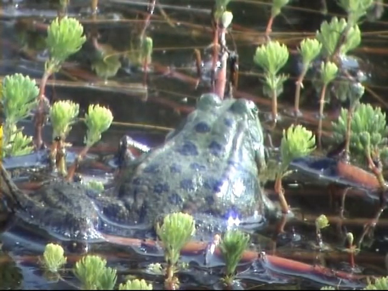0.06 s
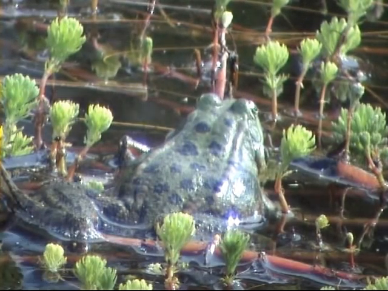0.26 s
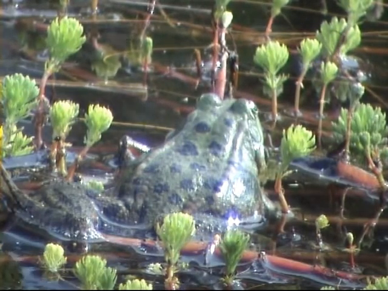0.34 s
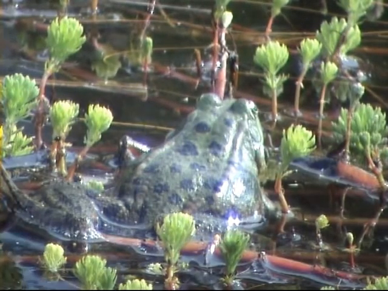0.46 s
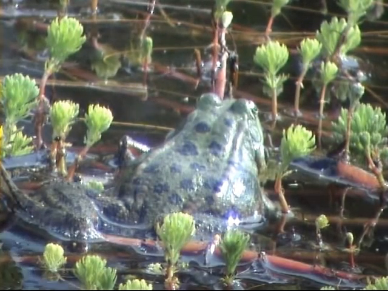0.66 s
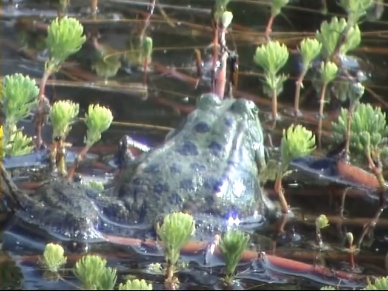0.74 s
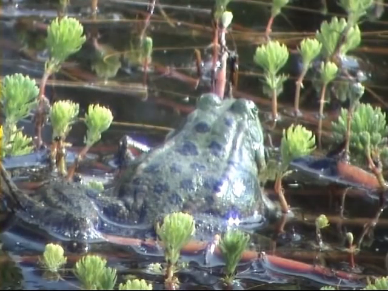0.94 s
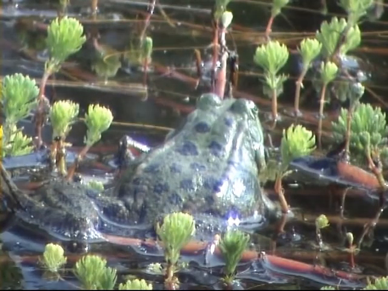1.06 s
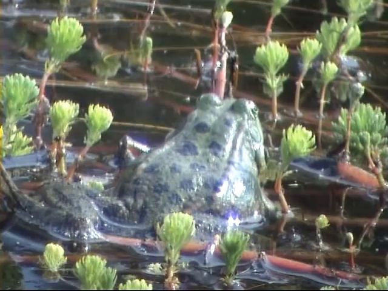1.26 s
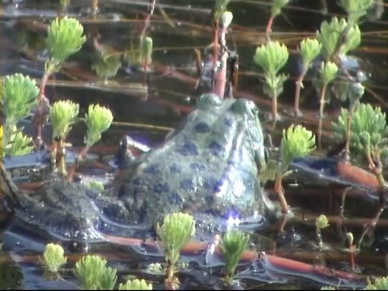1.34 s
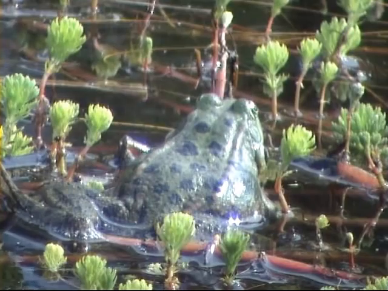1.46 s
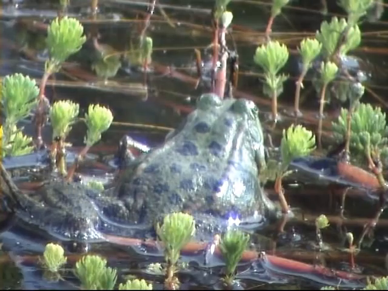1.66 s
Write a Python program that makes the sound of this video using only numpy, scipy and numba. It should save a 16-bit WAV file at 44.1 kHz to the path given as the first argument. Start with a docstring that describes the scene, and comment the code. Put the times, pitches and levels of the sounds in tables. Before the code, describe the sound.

A frog gives one rough, swelling croak, then a quick run of short cackles that fade at the end. Behind it at the pond are a small splash, faint bird chirps, distant frogs and a low outdoor rumble.

```python
"""At the edge of a pond, a frog gives one long rough croak, then a run of short cackles.
Its voice box makes fast snaps that ring its vocal sacs (the pouches it blows up) and its belly.
In most cackles the snaps slow down; a brief, thin ring marks the start of the third.
Behind the frog are a small splash, faint birds, a far chorus of frogs and a low outdoor rumble."""
import sys
import numpy as np
from scipy import signal
from scipy.fft import rfft, irfft
from scipy.io import wavfile
from scipy.ndimage import uniform_filter1d, minimum_filter1d
from numba import njit

SR = 44100
rng = np.random.default_rng(int(sys.argv[2]) if len(sys.argv) > 2 else 0)


def inscribe(sig):
    """Save sig as 16-bit PCM at rate SR to the path in sys.argv[1].

    A 1-D sig is mono; a 2-D sig holds one channel per row.
    Samples are clipped to [-1, 1] before scaling.
    """
    pcm = np.round(np.clip(np.atleast_2d(sig).T, -1, 1) * 32767)
    wavfile.write(sys.argv[1], SR, pcm.astype(np.int16))


N = 74970

JITTER, SHIMMER_DB = .06, 3.5  # at roughness 1: scatter of snap timing (share of a gap) and of level
FLUTTER_PER_S = 170  # how fast the pitch of the sacs wavers
SAC_PULL = 0.65  # share of the way a snap moves toward a crest of the sacs' swing


def frog():
    """One frog croaks, cackles and gurgles, with a faint fizz of air and an echo from the banks."""
    # Speed of the snaps in the long croak: (time [s], rate [snaps per s])
    croak_speed = [(.22, 460), (.238, 392), (.266, 398), (.28, 339), (0.311, 332), (0.324, 350),
                   (.338, 345), (.352, 305), (0.367, 256), (.385, 284), (0.394, 310), (.402, 335),
                   (.411, 335), (.419, 230), (0.432, 295), (0.452, 260), (0.465, 200), (.5, 179)]
    # Course of the long croak; belly and upper ring are relative to the snap: (time [s], snap level [dB],
    # sac pitch [Hz], belly [dB], upper ring [dB], upper pitch [Hz], roughness [0 = smooth])
    croak_shape = [(.215, -38, 1583, -43.5, -14.5, 4200, 0.58), (.228, -21.5, 1628, -33, -14, 4410, .3),
                   (.262, -19.5, 1676, -30.5, -23.5, 4350, 0.33),
                   (.285, -16.5, 1557, -18, -17.5, 4420, 0.16), (.308, -15.5, 1502, -15.5, -28, 4600, 0.11),
                   (.324, -12.5, 1388, -25, -22, 4690, 0.2), (.344, -13.5, 1154, -9.5, -30.5, 4980, 0.2),
                   (.365, -10, 1203, -19.5, -25.5, 4750, 0.02), (.39, -7.5, 1404, -20, -23, 4500, 0.1),
                   (.404, -7.5, 1368, -15, -15, 4300, .2), (.43, -6.5, 1505, -18.5, -12.5, 4230, .6),
                   (.455, -8.5, 1591, -15.5, -20.5, 4293, 0.4), (.477, -14, 1558, -19, -17, 4250, 0.8),
                   (.503, -18.5, 1637, -19.5, -25, 4200, 1.1)]
    # A low gurgle between two cackles: same columns as the croak
    gurgle_shape = [(1.15, -43.5, 600, -20, -42, 3700, 0.51), (1.175, -30.5, 807, -25.5, -35, 3700, 0.5),
                    (1.205, -18.5, 1252, -17.5, -30.5, 3700, 0.68)]
    # One cackle a row: (peak time [s], rate there [snaps per s], gap growth per snap [factor],
    # snap level [dB], rise [s], fall [s], sac pitch [Hz], sac bandwidth [Hz],
    # belly [relative dB], middle ring [relative dB], upper ring [relative dB])
    cackles = [ (.8243, 240, 1.103, -14, 0.025, .025, 1405, 277.5, -17, -33.5, -32),
               (0.918, 216, 1.08, -9, 0.03, 0.015, 1757, 196.4, -24.5, -15.5, -20.5),
               (1.0141, 230, 1.052, -6, 0.018, 0.021, 1774, 174, -23, -22.5, -14.5),
               (1.1183, 241, 1.1, -7, 0.022, 0.023, 1740, 180, -24.5, -27, -14),
               (1.2276, 210, 1.106, -5, .028, .016, 1641, 220, -24, -34.5, -19),
               (1.248, 227, 0.99, -13, 0.032, 0.02, 1506, 157, -29.5, -42.5, -13),
               (1.286, 284, 0.96, -15.5, 0.021, 0.02, 1557, 180, -31, -37, -11.5),
               (1.3283, 213, 1.13, -6.5, 0.02, 0.022, 1437, 238, -19, -37, -17),
               (1.4347, 210, 1.267, -9.5, 0.02, 0.03, 1460, 214, -23, -35, -22),
               (1.6043, 261, 1.13, -21.5, 0.029, 0.028, 1398, 236, -16.5, -47, -23),
               (1.686, 202, 1.19, -20, 0.028, 0.021, 1441, 220, -21.5, -48, -21.5)]
    # Tone colour of the voice: (frequency [Hz], gain [dB])
    voice_tone = [(200, -5.5), (500, 2), (800, 2), (1150, 0), (1380, 5), (1780, 5), (1980, -0.5),
                  (2300, 2.5), (2900, -3), (4400, -4.5), (5300, 0), (6200, -10), (10500, -9),
                  (15000, -21.5)]
    long_call = croak(croak_shape, np.interp(np.arange(N) / SR, *np.array(croak_speed).T))
    short_calls = sum(cackle(*row) for row in cackles) + croak(gurgle_shape, rate_hz=228.7)
    voice = pan(long_call, db=-0.5) + pan(short_calls, db=0.7)
    low_cut = signal.butter(6, 355, "high", fs=SR, output="sos")
    voice = colour(signal.sosfilt(low_cut, voice), voice_tone)
    breath = np.abs(long_call) ** .3 * rng.standard_normal(N)
    fizz = level(ring(breath, hz=9270, width_hz=3000), db=-72)
    return from_the_left(voice) + fizz + bank_echo(voice)


def croak(curve, rate_hz):
    """A long run of snaps rings the sacs at a gliding pitch; roughness makes the snaps uneven."""
    t = np.arange(N) / SR
    when, db, sac_hz, belly_db, upper_db, upper_hz, rough = np.array(curve).T
    cycles = np.cumsum(rate_hz * ((t > when[0]) & (t < when[-1]))) / SR
    times = np.interp(np.arange(1, cycles[-1]), cycles, t)
    per_snap = lambda column: np.interp(times, when, column)
    level_luck, time_luck = rng.standard_normal((256, 2))[:len(times)].T * per_snap(rough)
    snap_db = per_snap(db) + SHIMMER_DB * level_luck
    flutter = .045 * np.interp(t, when, rough) * wander(FLUTTER_PER_S)
    sac = np.interp(t, when, sac_hz) * (1 + flutter)
    uneven = times + JITTER * time_luck * np.gradient(times)
    uneven = pull_to_crests(uneven, sac, SAC_PULL * np.minimum(2 * per_snap(rough), 1))
    return throat(uneven, snap_db, snap_db + per_snap(belly_db), snap_db - 49, snap_db + per_snap(upper_db),
                  sac, width_hz=172, upper_hz=np.interp(t, when, upper_hz))


def cackle(at, rate_hz, growth, db, rise_s, fall_s, sac_hz, width_hz, belly_db, middle_db, upper_db):
    """A thin squeak of snaps swells and dies away; growth above 1 slows the snaps down."""
    fastest_hz, roughness, rise_db, fall_db = 579, .15, 20, 17.5
    squeak_db, squeak_s = -14, 0.03
    count = np.arange(-20, 10)  # snap 0 is the peak
    gaps = np.maximum(growth ** count / rate_hz, 1 / fastest_hz)
    from_peak = np.cumsum(gaps) - gaps - gaps[count < 0].sum()
    level_luck, time_luck = roughness * rng.standard_normal((len(count), 2)).T
    squeak = squeak_db - rise_db * (from_peak / squeak_s) ** 4
    rise = np.maximum(-rise_db * np.abs(from_peak / rise_s) ** 1.8, squeak)
    fall = -fall_db * (from_peak / fall_s) ** 2
    effort_db = np.where(from_peak < 0, rise, fall) + SHIMMER_DB * level_luck
    high_db = db + np.where(from_peak < 0, 0.44, 1) * effort_db  # the high rings swell less steeply
    # The pitch of the sacs sags when the effort is low.
    sag = .004 * np.interp(np.arange(N) / SR, at + from_peak, np.maximum(effort_db, -rise_db))
    sac = sac_hz * (1 + sag + .022 * wander(FLUTTER_PER_S))
    times = pull_to_crests(at + from_peak + JITTER * time_luck * gaps, sac, SAC_PULL)
    upper_hz = 4330 + 0.43 * (sac_hz - 1650)  # partly follows the sacs
    return throat(times, db + effort_db, db + belly_db + effort_db, high_db + middle_db,
                  high_db + upper_db, sac, width_hz, upper_hz)


def pull_to_crests(times, sac_hz, pull):
    """The ringing sacs trip each snap near a crest of their own swing, so the ring builds up."""
    t = np.arange(N) / SR
    cycle = np.interp(times, t, np.cumsum(sac_hz) / SR)
    return times - pull * (cycle - np.round(cycle)) / np.interp(times, t, sac_hz)


def throat(times, db, belly_db, middle_db, upper_db, sac_hz, width_hz, upper_hz):
    """Each snap and its puff of air ring the sacs, the belly and two high, thin tones."""
    air_db, puff_s = -26, 0.0022
    air = amp(air_db) * rng.standard_normal(N)

    def push(snap_db):
        pulses = snaps(times, amp(snap_db))
        return pulses + air * signal.lfilter([1], [1, -np.exp(-1 / (puff_s * SR))], pulses)

    sacs = ring(push(db), sac_hz, width_hz)
    belly = ring(push(belly_db), hz=391, width_hz=69)
    middle = ring(push(middle_db), hz=3480, width_hz=98)
    upper = ring(push(upper_db), upper_hz, width_hz=162)
    return sacs + belly - middle - upper


def from_the_left(voice):
    """The voice arrives louder on the left, and slightly out of step between the two sides."""
    # How much louder the left side is: (frequency [Hz], left minus right [dB])
    balance = [(60, 3.0), (99, 3.5), (160, 5.0), (270, 2.5), (440, 11), (720, 5.5), (1190, 4.4),
               (1960, 1.2), (3220, 1.0), (5300, 0.5)]
    # How far the left wave runs ahead: (frequency [Hz], phase lead [radians])
    lead = [(0, 0), (260, 0.6), (600, 0.38), (1460, -0.7), (1720, -0.5), (3270, -0.88), (3530, 0.59),
            (4310, -0.77), (4740, -0.17), (5510, -0.0)]
    half = np.log(amp(on_bins(balance))) / 2 + 1j * on_bins(lead) / 2
    return irfft(rfft(voice, 2 * N) * np.exp([half, -half]))[:, :N]


def bank_echo(voice):
    """The banks throw the voice back as a soft, fading wash."""
    fade_s = 1  # time to fall by 60 dB
    tail = rng.standard_normal((2, N)) * np.exp(-np.log(1000) * np.arange(N) / SR / fade_s)
    return signal.fftconvolve(voice, level(tail, db=-25.5) / np.sqrt(N), axes=1)[:, :N]


def splash_and_thin_ring():
    """A small splash of short rings, and a brief, thin ring at the start of the third cackle."""
    # Short rings; the last row is the thin one: (time [s], pitch [Hz], bandwidth [Hz], level [dB])
    short_rings = [(.6335, 1750, 650, -18.5), (0.98, 980, 156, -33), (0.93, 2500, 800, -27),
                   (0.75, 9300, 3430, -42), (1, 3460, 108, -31)]
    return sum(ring(snaps(np.array([at]), amp(db)), hz, width) for at, hz, width, db in short_rings)


def birds():
    """Far birds whistle short, faint glides."""
    # Whistles: (start [s], length [s], first pitch [Hz], last pitch [Hz], level [dB])
    chirps = [(0.014, 0.037, 2100, 2510, -46.5), (0.509, 0.033, 2190, 2540, -47),
              (0.657, 0.0365, 2150, 2465, -43.5), (1.447, 0.061, 2150, 2496, -47),
              (1.533, .045, 5250, 4700, -55.5)]
    out = 0
    for at, length, start_hz, end_hz, db in chirps:
        progress = np.clip((np.arange(N) / SR - at) / length, 0, 1)
        hz = start_hz + (end_hz - start_hz) * np.sin(np.pi * progress / 2) + 30 * wander(220)
        out = out + amp(db) * np.sin(np.pi * progress) * np.sin(2 * np.pi * np.cumsum(hz) / SR)
    return out


def far_frogs():
    """Four distant frogs rattle as uneven snaps ring their sacs."""
    sac_hz, width_hz, rate_hz = 1574, 240, 190
    chorus = 0
    for _ in range(4):
        cycles = np.cumsum(rate_hz * np.exp(0.2 * wander(60))) / SR
        pulses = np.diff(np.floor(cycles), prepend=0) * amp(2.4 * wander(53))
        rattle = ring(pulses, sac_hz * (1 + 0.093 * wander(8.4)), width_hz)
        chorus = chorus + pan(ring(rattle, sac_hz, 3 * width_hz), db=4 * rng.standard_normal())
    return level(chorus, db=-53)


def outdoor_rumble():
    """Rumble, hiss and a wavering hum, louder on the left."""
    # Tone colour of the outdoor noise: (frequency [Hz], relative level [dB])
    noise_tone = [(15, -2), (32, -2), (50, -5.5), (130, -0.5), (180, -8), (270, -8.5), (360, -9.5),
                  (550, -8), (800, -13), (1150, -8), (1500, -6), (2000, -13.5), (2800, -19), (4500, -23.5),
                  (6000, -31.5), (10500, -38), (12500, -47.5), (15000, -52.5)]
    centre, side = level(colour(rng.standard_normal((2, N)), noise_tone), db=-44)
    hum_hz = 202.6 * (1 + 0.0052 * wander(9.2))
    hum = amp(-56) * np.sqrt(2) * np.sin(2 * np.pi * np.cumsum(hum_hz) / SR)
    return pan(centre + hum + amp(-6) * np.array([side, -side]), db=5)


def snaps(times, sizes):
    """Single clicks, each shared between two neighbouring samples."""
    at = np.clip(times * SR, 0, N)
    i = at.astype(int)
    before = np.bincount(i, sizes * (1 - at + i), N + 2)
    after = np.bincount(i + 1, sizes * (at - i), N + 2)
    return (before + after)[:N]


def ring(x, hz, width_hz):
    """Make each click ring at a pitch; a wider band dies away sooner."""
    return resonate(x, np.exp((2j * np.pi * hz - np.pi * width_hz) / SR) * np.ones(N))


@njit
def resonate(x, pole):
    """One vibration pushed by x; the pole turns and shrinks it at every sample."""
    y, swing = np.empty(len(x)), 0j
    for i in range(len(x)):
        swing = swing * pole[i] + x[i] + 1e-18
        y[i] = swing.imag
    return y


def colour(x, points):
    """Shape the tone by (Hz, dB) points."""
    cepstrum = irfft(np.log(amp(on_bins(points))))
    cepstrum[1:N] *= 2  # folded forward so nothing rings before its cause
    cepstrum[N + 1:] = 0
    return irfft(rfft(x, 2 * N) * np.exp(rfft(cepstrum)))[..., :N]


def on_bins(points):
    """Spread (Hz, value) points over the frequencies of a double-length spectrum."""
    hz, value = np.array(points, float).T
    return np.interp(np.log(np.arange(N + 1) * SR / (2 * N) + 1), np.log(hz), value)


def wander(per_s):
    """A smooth random drift with a typical size of 1."""
    hold = int(SR / per_s)
    steps = np.repeat(rng.standard_normal(N // hold + 1), hold)
    drift = uniform_filter1d(steps, hold)[:N]
    return drift / drift.std()


def amp(db):
    """Turn decibels into a gain."""
    return 10 ** (np.asarray(db) / 20)


def level(x, db):
    """Set the average (rms) level."""
    return x * amp(db) / np.sqrt(np.mean(x ** 2))


def pan(x, db):
    """Make the left side db louder than the right."""
    return x * amp(np.array([[db], [-db]]) / 2)


def scene():
    """The frog in front of the pond's background."""
    return frog() + outdoor_rumble() + far_frogs() + birds() + splash_and_thin_ring()


def record(dry):
    """A fast limiter turns the loudest peaks down to full scale; the highest treble is cut."""
    gain = minimum_filter1d(1 / np.maximum(np.abs(dry).max(axis=0), 1), size=256)
    limited = dry * uniform_filter1d(gain, size=256)
    return signal.sosfilt(signal.ellip(8, .2, 70, 15600, fs=SR, output="sos"), limited)


dry = scene()
out = record(dry)
inscribe(out)
```